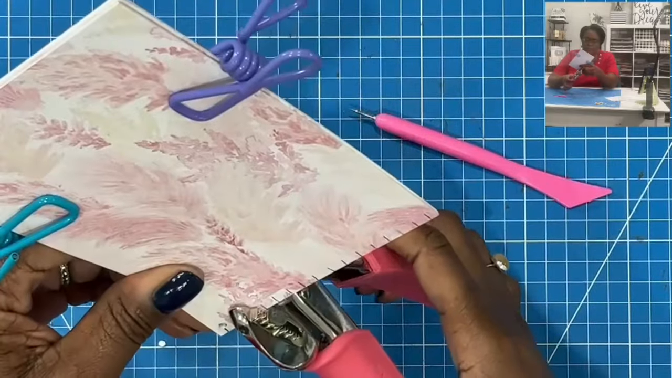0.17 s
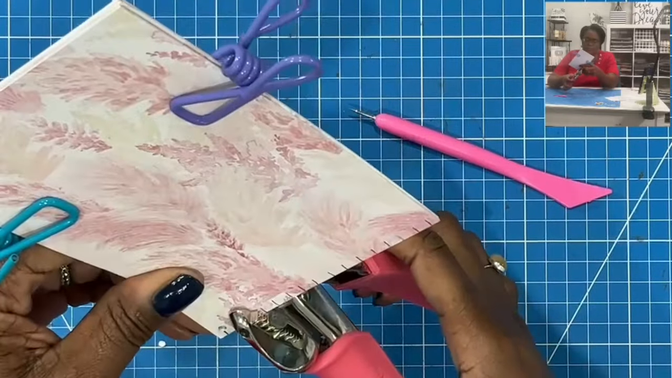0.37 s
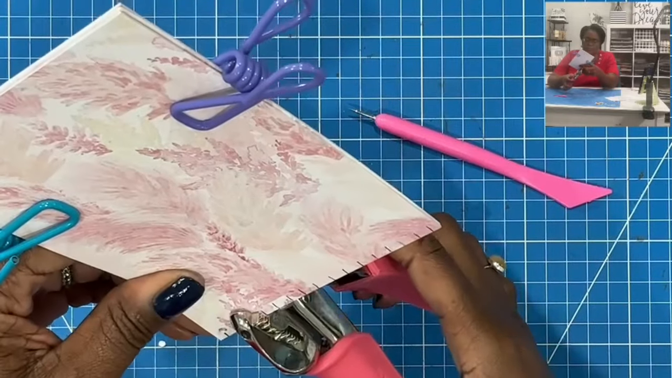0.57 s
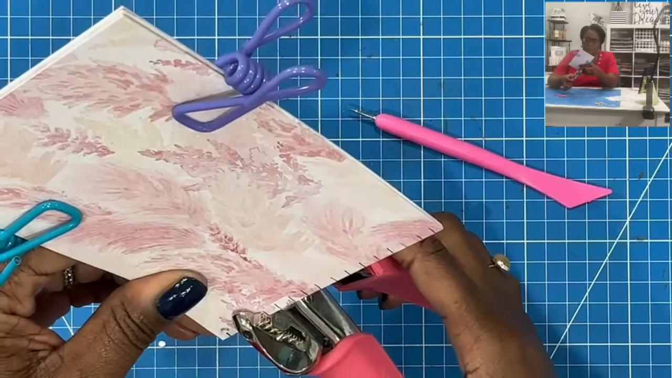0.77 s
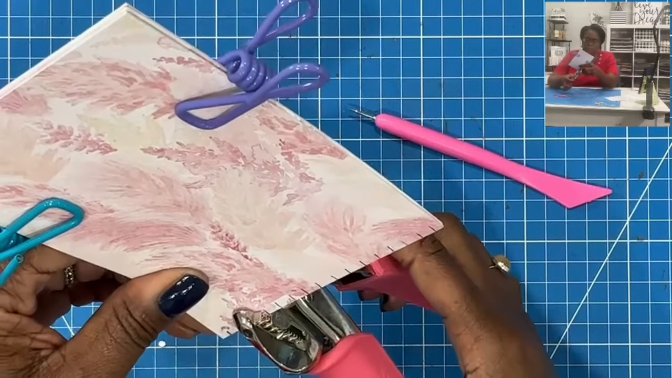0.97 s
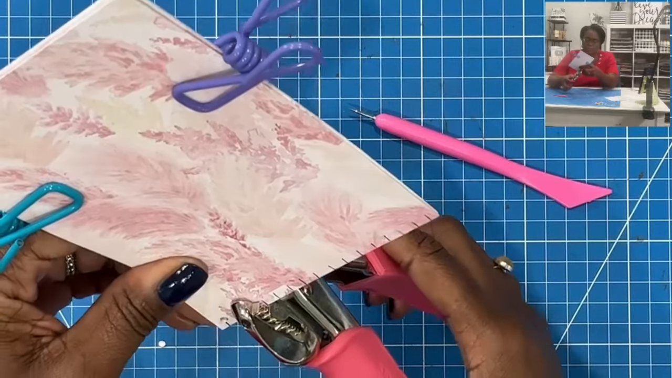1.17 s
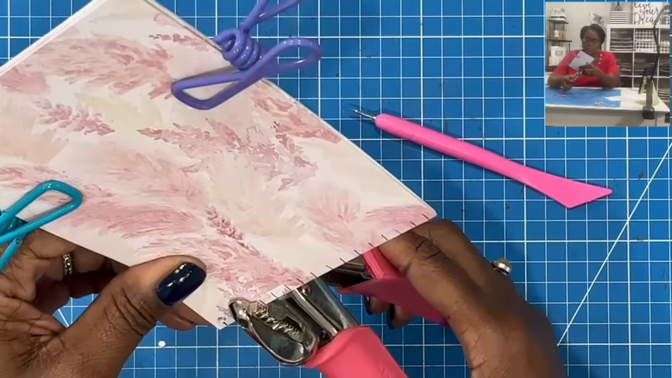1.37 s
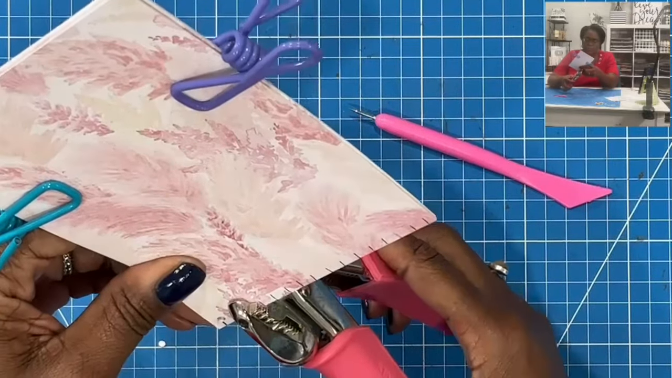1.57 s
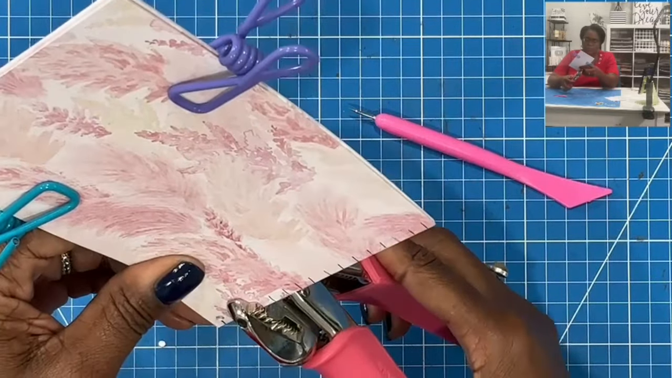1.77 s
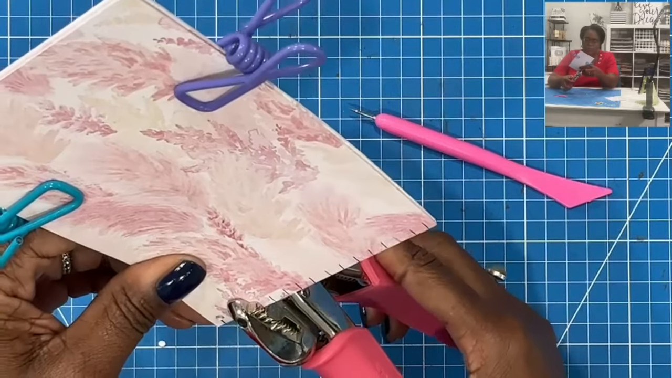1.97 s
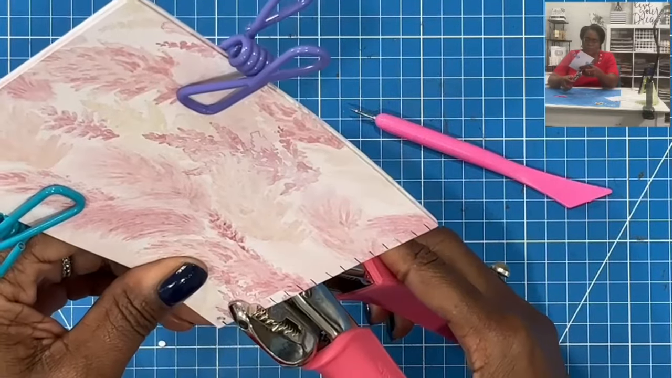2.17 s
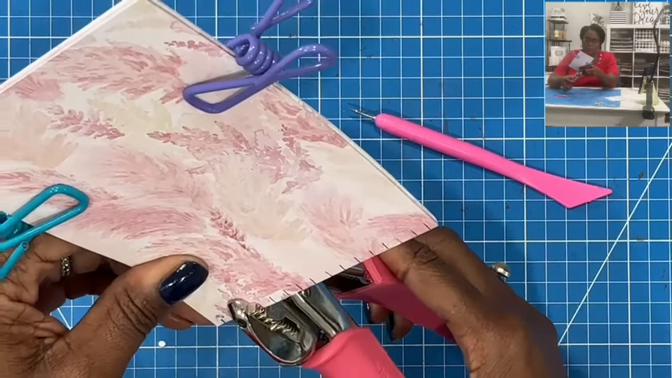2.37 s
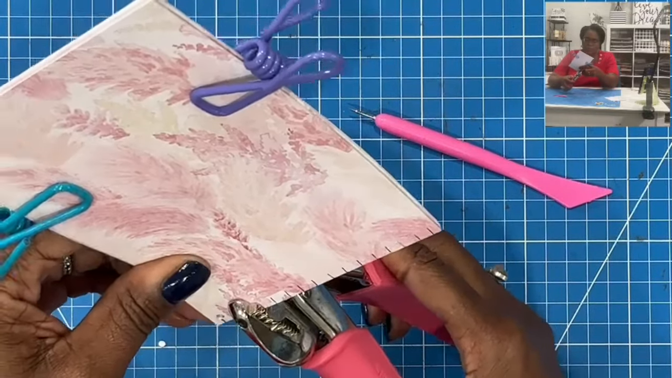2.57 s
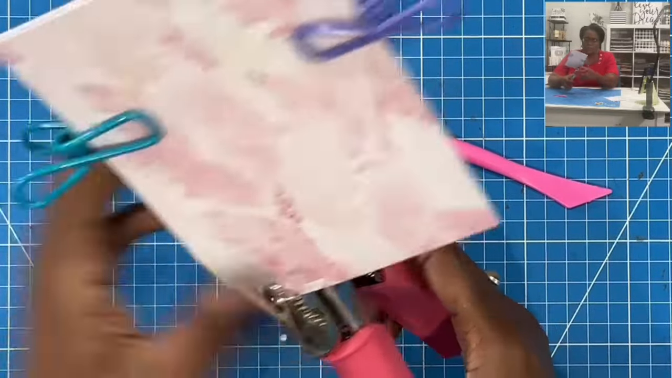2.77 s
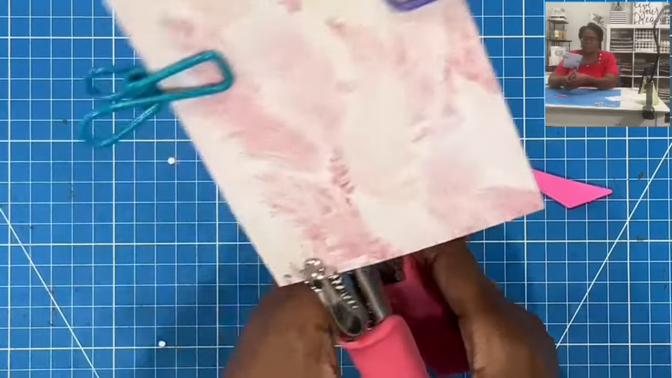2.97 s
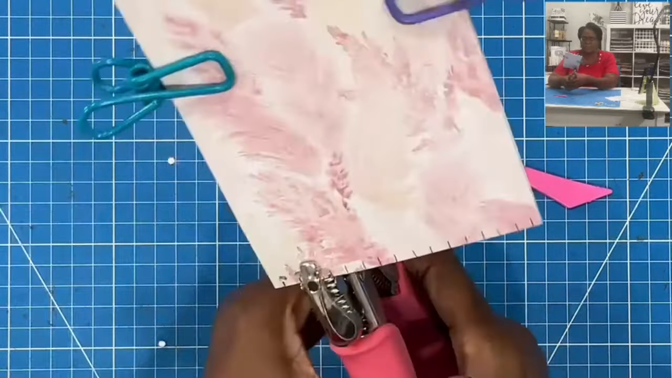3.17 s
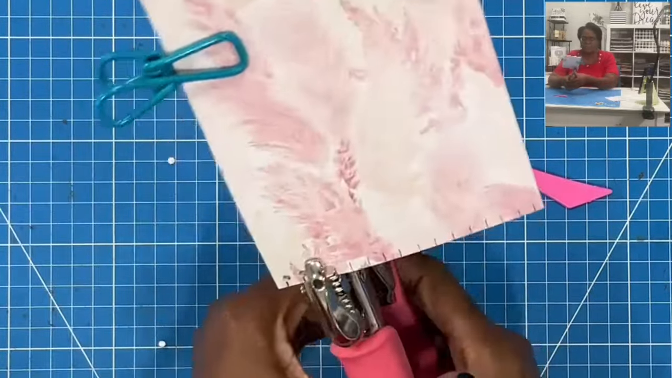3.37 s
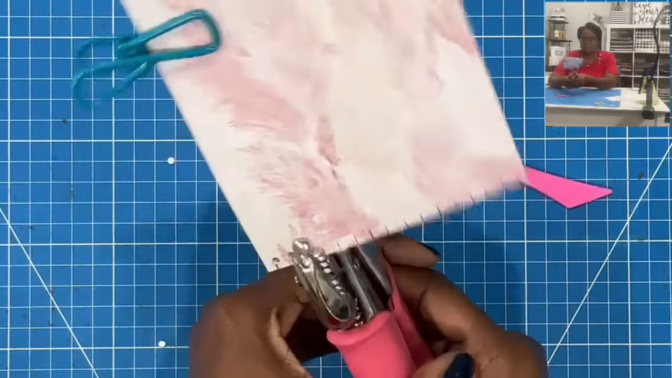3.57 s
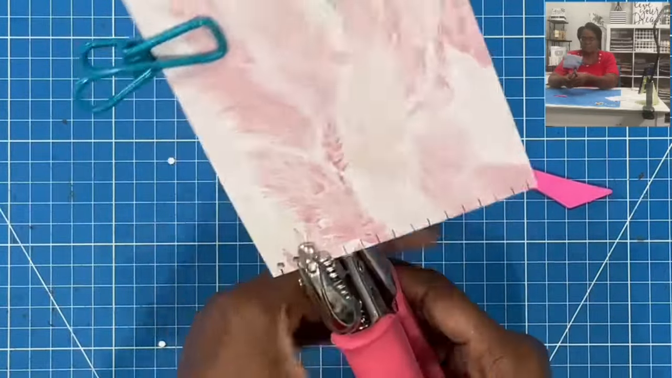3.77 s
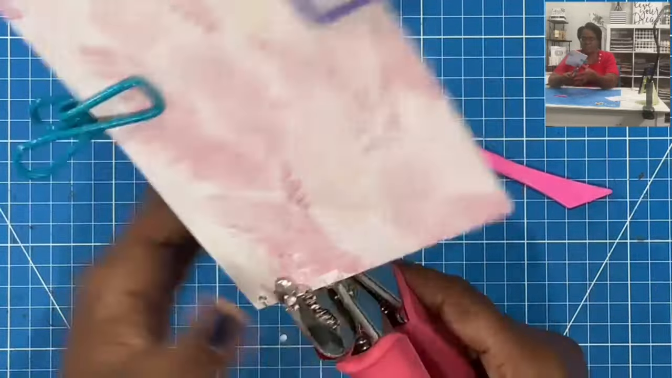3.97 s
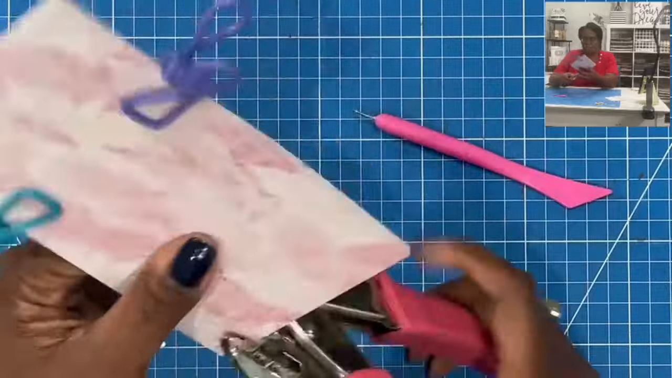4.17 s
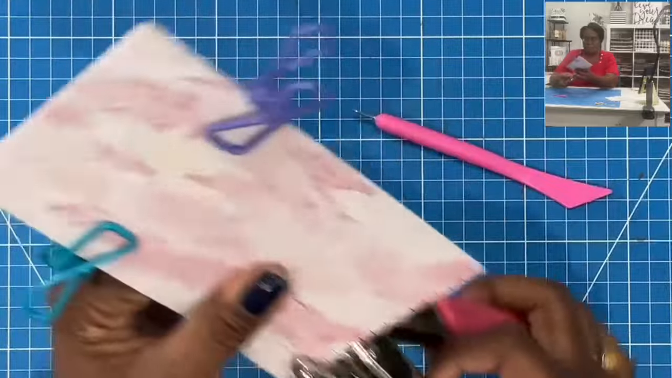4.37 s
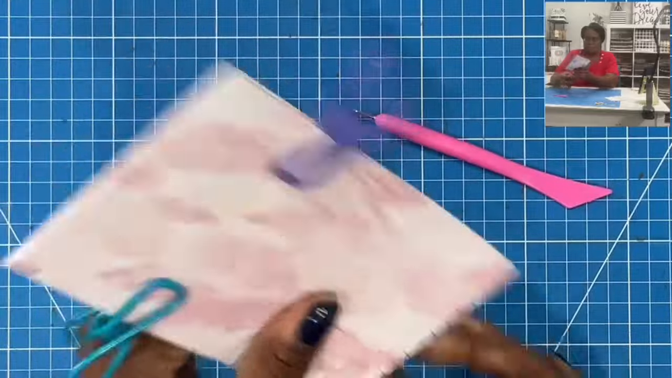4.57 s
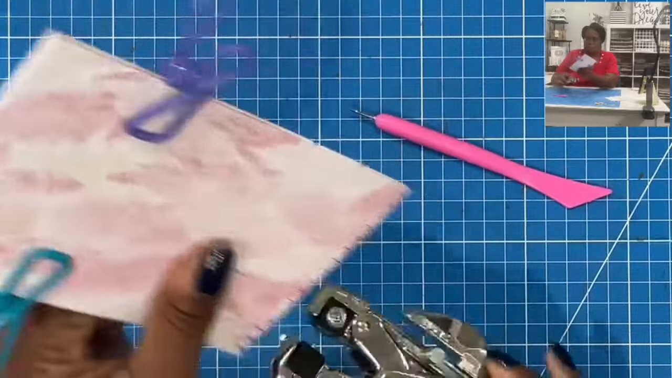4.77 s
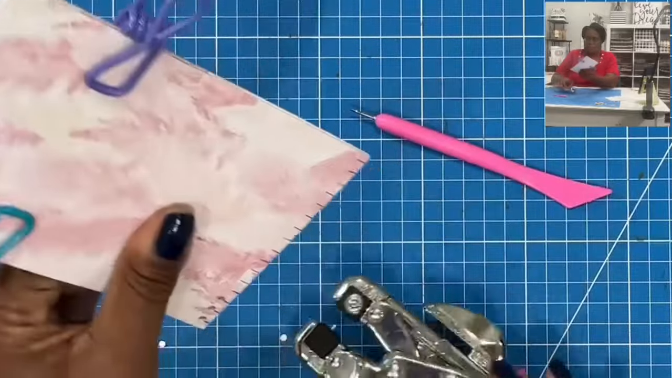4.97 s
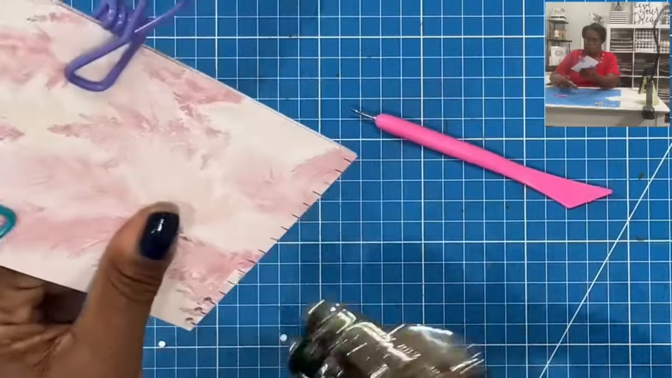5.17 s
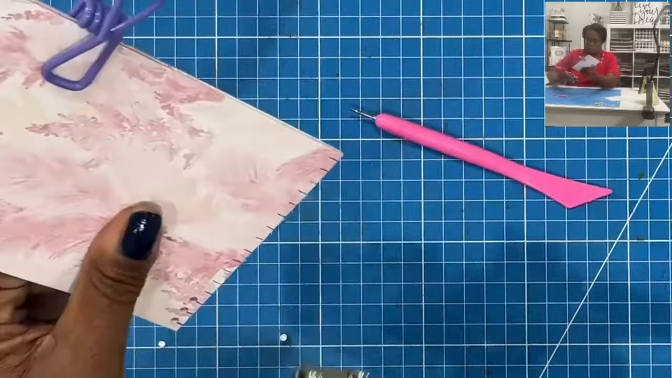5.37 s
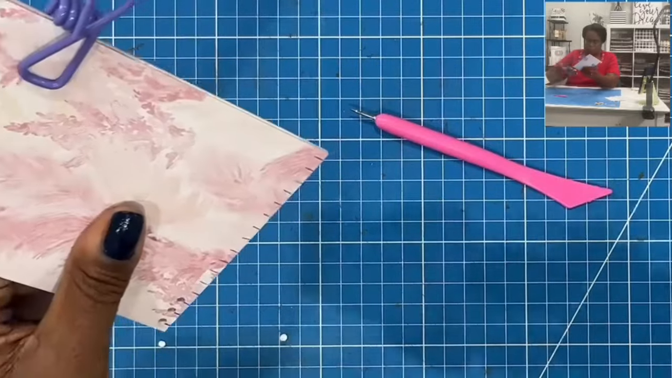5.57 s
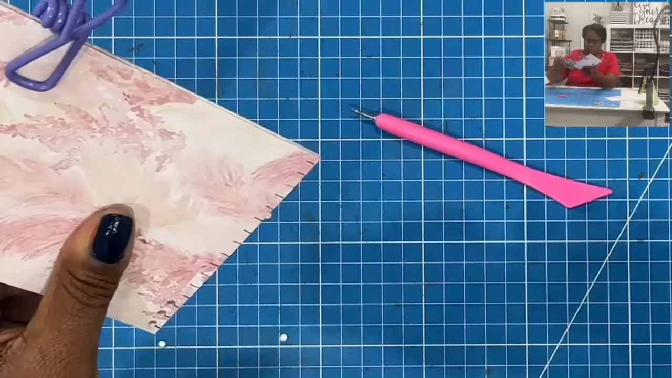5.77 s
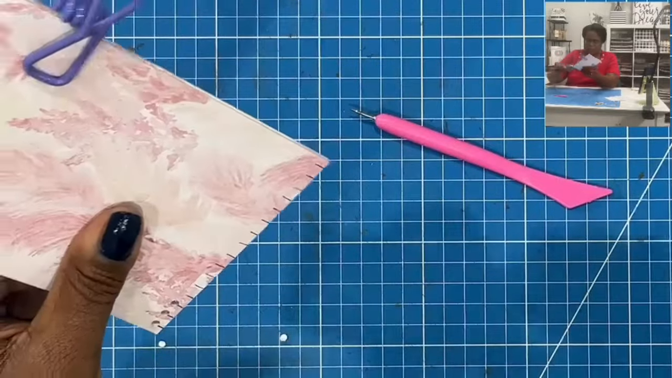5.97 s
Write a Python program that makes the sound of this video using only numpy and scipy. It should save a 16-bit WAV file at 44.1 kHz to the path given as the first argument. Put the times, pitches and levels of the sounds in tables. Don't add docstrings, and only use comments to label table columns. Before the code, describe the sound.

Steady soft fan noise and fuzzy low drones run throughout. After some very faint handling of card comes a single loud, compact snap of steel jaws biting through it, with a short room tail. Soft scuffs and a thin steel squeak follow as the card is pulled out, then small clicks, a bright jingle and chatter as the tool meets the desk. Small room, heard from far off.

```python
import sys
import numpy as np
from scipy import signal
from scipy.fft import rfft, irfft, next_fast_len
from scipy.io import wavfile
from scipy.ndimage import uniform_filter1d

SR = 44100
rng = np.random.default_rng(int(sys.argv[2]) if len(sys.argv) > 2 else 0)


def store_pcm(level_fs):
    pcm = np.round(np.clip(level_fs, -1, 1) * 32767).astype(np.int16)
    wavfile.write(sys.argv[1], SR, np.atleast_2d(pcm).T)


def amplitude_ratio(level_db):
    exponent = np.asarray(level_db, float) / 20
    return 10 ** exponent


N = 265658

# (frequency [Hz], level [dB per Hz])
AIR_COLOUR = [(30, -44), (45, -17.5), (60, 0), (110, -6.5), (170, -10.5), (450, -14), (700, -12),
              (1250, -17), (2200, -20.5), (3000, -26.5), (4000, -36.5), (6500, -37.5), (10000, -33),
              (15500, -41.5)]
# (frequency [Hz], width [Hz], level [dB], steady part against wavering part [ratio])
DRONES = [(62.7, 24, -58, 0.75), (103.5, 18, -58, 0.16), (319, 120, -55, 2.6)]
# (time [s], frequency [Hz])
MOTOR_TURNS = [(0, 1115), (1.25, 1083), (2.55, 1112), (3.55, 1095), (4.25, 1107), (5.1, 1095), (6.03, 1108)]
# (time [s], centre [Hz], width [octaves], level [dB])
SCUFFS = [(1.199, 2700, 0.28, -41.5), (1.199, 484, 0.66, -42), (1.203, 1500, 0.83, -41.5),
          (1.707, 4100, 0.86, -46.5), (4.035, 1390, 1.04, -33), (4.041, 4280, 0.53, -37.5),
          (4.035, 343, 0.77, -41), (4.154, 8000, 1.1, -33), (4.200, 960, 0.87, -35),
          (4.458, 6200, 0.34, -41), (4.561, 285, 0.6, -43)]
# (time when full [s], level [dB], hold [s], fall [dB/s], dull share [dB])
BRUSHES = [
    (2.708, -63, 0.0016, 120, 4),
    (3.88, -67, .004, 600, -1.5),
    (4.3, -56, 0.0017, 70, 7),
    (4.46, -53.5, .002, 63, -1),
    (4.622, -54, .002, 123, -0.5),
    (4.74, -75, .002, 36, 15),
    (5.258, -57, 0.0022, 350, -19),
    (5.436, -56, 0.0045, 1500, -8),
]
# (frequency [Hz], level [dB per Hz])
BRUSH_COLOUR = [(1500, -8), (3500, -6), (5500, -5.5), (7800, -8.5), (10000, -1.5), (11800, -6),
                (13500, -17.5), (16000, -23)]
# (time [s], blow [dB], grip ring [dB], card thump [dB])
SNAP_STAGES = [
    (3.5145, -10, -10, -24.5),
    (3.5199, -19, -14, -19.5),
    (3.5235, -3.5, -20.5, -6),
    (3.529, -17.5, -22, -12.5),
    (3.534, -17, -32, -22),
]
# (frequency [Hz], level [dB per Hz])
CRACK_COLOUR = [(120, -31.5), (200, -17), (330, -4), (750, -12), (1100, -3.5), (1500, -4.5), (2500, -1),
                (3400, -4), (4500, -4.5), (6300, -7), (9800, -3.5), (12800, -5), (15500, -17.5)]
# (frequency [Hz], level [dB], time to fall 60 dB [s])
STEEL_MODES = [(2275, 3, .03), (2590, 0, 0.022), (3340, -4, 0.025), (4850, -8.5, 0.02), (5690, -0.5, 0.011),
               (9720, 9, .011), (13500, 0, 0.015)]
# (frequency [Hz], level [dB], time to fall 60 dB [s])
CARD_MODES = [(264, 2, 0.04), (323, -1, .04), (530, -5.5, 0.03)]
# (multiple of its pitch [ratio], level [dB], time to fall 60 dB [s])
GRIP_MODES = [(1.001, 3.5, 0.05), (1.2, -9, .03), (1.64, -11, 0.017), (1.33, -1, 0.027)]
# (frequency [Hz], level [dB], time to fall 60 dB [s])
HINGE_MODES = [(2636, -6, 0.016), (3620, 1, 0.0053), (2100, -7.5, 0.016)]
# (time when full [s], level [dB], hold [s], fall [dB/s], dull share [dB])
DRAGS = [
    (4.174, -37, 0.02, 161, -16),
    (4.28, -76, .002, 170, 0),
]
# (frequency [Hz], level [dB per Hz])
DRAG_COLOUR = [(880, -44), (1500, -17), (1900, 0), (2230, -27), (3000, -7), (3770, 0), (5540, -3),
               (6060, -6), (9950, -1), (16000, -10)]
# (time [s], grip pitch [Hz], grip [dB], lever [dB], pin [dB])
KNOCKS = [
    (4.173, 1020, -53, -47, -32),
    (5.453, 1070, -31, -48, -37.5),
    (5.551, 1087, -41, -46, -68),
    (5.565, 1346, -35, -36.5, -47),
    (5.687, 1280, -58, -40, -35),
    (5.774, 1088, -34, -37.5, -47),
    (5.805, 1084, -48, -45, -31.5),
    (5.873, 1090, -33, -34, -27),
    (6.014, 1334, -33.5, -42, -56),
]
# (frequency [Hz], level [dB], time to fall 60 dB [s])
LEVER_MODES = [(5230, -5.5, 0.015), (6540, -39.5, .005), (6840, 22, 0.0017)]
# (frequency [Hz], level [dB], time to fall 60 dB [s])
PIN_MODES = [(9600, 20, 0.0073), (10660, 26, 0.004), (12900, -4, 0.0044), (15000, -12, .004)]
PART_SPREAD = (0.029, .08, 0.16, 0.175)
# (time when full [s], level [dB], hold [s], fall [dB/s], octave [dB])
SQUEAKS = [
    (4.256, -40.5, 0.0087, 1500, -14),
    (4.305, -53.5, .005, 600, -8),
]
# (time [s], level [dB])
JINGLES = [
    (5.609, -41),
    (5.628, -34.5),
    (5.650, -52),
]
# (frequency [Hz], level [dB], time to fall 60 dB [s])
STOP_MODES = [(5570, -4, 0.028), (5740, -9, 0.014), (9270, -4, 0.022), (9540, -1, 0.035), (10940, -7, .02),
              (13400, -16, .02), (15000, 0.5, 0.034)]
# (time when full [s], level [dB], hold [s], fall [dB/s], dull share [dB])
CHATTERS = [
    (5.616, -43.5, 0.077, 380, -5.5),
    (5.812, -34.5, .002, 330, -6),
    (5.884, -31, .002, 162, -7.5),
]
# (frequency [Hz], level [dB per Hz])
CHATTER_COLOUR = [(1500, -23), (3500, -27), (4400, -4), (5200, -1), (7500, -2), (10000, 2.5), (13000, -3.5),
                  (16000, -8.5)]
RISE = dict(drag=910, brush=156, chatter=1100., squeak=330)
# (frequency [Hz], time to fall 60 dB [s])
WALLS = [(300, 0.17), (1000, 0.2), (3500, 0.19), (8000, 0.19), (15000, 0.21)]
# (frequency [Hz], time to fall 60 dB [s])
HALL = [(300, 0.42), (1500, 0.46), (3800, 0.56), (7000, 0.42), (15000, .25)]
# (delay [s], level [dB])
ECHOES = [(.0046, -5), (.0093, 2), (.0150, -3), (.0205, -3)]


def evened(x):
    return x / np.sqrt(np.mean(x ** 2) + 1e-20)


def read(points, hz):
    f, value = np.transpose(points)
    return np.interp(np.log(hz + 1), np.log(f + 1), value)


def add(mix, s, sound):
    part = mix[round(s * SR):][:len(sound)]
    part += sound[:len(part)]


def coloured(x, points):
    size = next_fast_len(len(x))
    gain = amplitude_ratio(read(points, np.fft.rfftfreq(size, 1 / SR)))
    return evened(irfft(rfft(x, size) * gain, size)[:len(x)])


def click(colour_db):
    log_gain = np.log(amplitude_ratio(np.maximum(colour_db, -80)))
    full = np.concatenate([log_gain, log_gain[-2:0:-1]])
    pulse = np.fft.ifft(np.exp(np.conj(signal.hilbert(full)))).real[:1024]
    return pulse / abs(pulse).max()


def scatter(size):
    phase = 2j * np.pi * rng.random(size // 2 + 1)
    smear = irfft(np.exp(phase), size) * np.linspace(1.4, .4, size)
    return smear / np.linalg.norm(smear)


def strokes(rows, rise):
    s, db, hold, fall, side_db = np.transpose(rows)[..., None]
    t = np.arange(N) / SR - s
    level_db = db + rise * np.minimum(t, 0) - fall * np.maximum(t - hold, 0)
    return amplitude_ratio(level_db).sum(0), amplitude_ratio(level_db + side_db).sum(0)


def ring(modes, spread_db=4.0, damp=1.0, crowd_db=-3.5, width=0.19, rise_cycles=0.98, count=5):
    t = np.arange(SR // 12) / SR
    hz, db, t60 = np.repeat(modes, count, axis=0).T[..., None]
    pitch_luck, level_luck, sign_luck = rng.standard_normal((3, len(hz), 1))
    main = (np.arange(len(hz)) % count == 0)[:, None]
    hz = hz * np.where(main, 1, 1 + width * pitch_luck)
    db = db + spread_db * level_luck + np.where(main, 0, crowd_db)
    t60 = t60 * damp * np.where(main, 1, .5)
    strength = np.sign(sign_luck) * amplitude_ratio(db - 60 * t / t60)
    attack = np.minimum(t * hz / rise_cycles, 1)
    return (strength * np.sin(2 * np.pi * hz * t) * attack).sum(0)


def grip(hz):
    return [(hz * k, db, t60) for k, db, t60 in GRIP_MODES]


def rubbing(rows, rise, colour):
    slips_per_s, uneven_db = 15000, 1.5
    bright, dull = strokes(rows, rise)
    slips = rng.standard_normal(N) * amplitude_ratio(uneven_db * rng.exponential(1, N))
    slips *= rng.random(N) < slips_per_s / SR
    handle = ring(grip(1220), damp=0.12) + ring(HINGE_MODES, damp=0.35)
    body = evened(signal.oaconvolve(slips, handle)[:N])
    return bright * coloured(slips, colour) + dull * body


def whine():
    housing_hz, half_width_hz, peak_db = 1112, 7.3, -57
    s, turns_hz = np.transpose(MOTOR_TURNS)
    place = np.interp(np.arange(N) / SR, s, np.arange(len(s)))
    smooth_place = place // 1 + np.sin(np.pi / 2 * (place % 1)) ** 2
    hz = np.interp(smooth_place, np.arange(len(s)), turns_hz)
    gain = amplitude_ratio(peak_db) / np.hypot(1, (hz - housing_hz) / half_width_hz)
    return np.sqrt(2) * gain * np.sin(2 * np.pi * np.cumsum(hz) / SR)


def fan():
    t = np.arange(N) / SR
    out = amplitude_ratio(-51) * coloured(rng.standard_normal(N), AIR_COLOUR)
    for hz, width_hz, db, steady in DRONES:
        r = np.exp(-np.pi * width_hz / SR)
        a, b = signal.lfilter([1], [1, -2 * r, r * r], rng.standard_normal((2, N)))
        turn = 2 * np.pi * hz * t
        wave = (steady + evened(a)) * np.cos(turn) + evened(b) * np.sin(turn)
        out += amplitude_ratio(db) * evened(wave)
    return out + whine()


def scuffs():
    out, hz = np.zeros(N), np.fft.rfftfreq(2048, 1 / SR) + 1
    for s, centre_hz, octaves, db in SCUFFS:
        colour_db = -6 * (np.log2(hz / centre_hz) / octaves) ** 2
        add(out, s, amplitude_ratio(db + 10) * np.convolve(click(colour_db), scatter(size=256)))
    return out


def brushing():
    return rubbing(BRUSHES, RISE["brush"], BRUSH_COLOUR)


def snap():
    sharp, thud = np.zeros(N), np.zeros(N)
    crack = click(read(CRACK_COLOUR, np.fft.rfftfreq(2048, 1 / SR)))
    for s, db, grip_db, card_db in SNAP_STAGES:
        add(sharp, s, amplitude_ratio(db + 20) * np.convolve(crack, scatter(size=64)))
        add(sharp, s, amplitude_ratio(db - 11) * ring(STEEL_MODES))
        add(thud, s, amplitude_ratio(grip_db) * ring(grip(1046), damp=0.6, width=0.065))
        add(thud, s, amplitude_ratio(card_db - 5) * ring(CARD_MODES, width=0.064, rise_cycles=1.6))
    return sharp, thud


def knocks():
    out = np.zeros(N)
    for s, grip_hz, grip_db, lever_db, pin_db in KNOCKS:
        hinge_db = (grip_db + lever_db) / 2 - 1
        parts = grip(grip_hz), HINGE_MODES, LEVER_MODES, PIN_MODES
        parts_db = grip_db, hinge_db, lever_db, pin_db
        for part, db, spread in zip(parts, parts_db, PART_SPREAD):
            sound = ring(part, crowd_db=-8.0, width=spread, rise_cycles=3.85, count=12)
            add(out, s, amplitude_ratio(db + 11) * sound / abs(sound).max())
    return out


def dragging():
    return rubbing(DRAGS, RISE["drag"], DRAG_COLOUR)


def squeak():
    pitch_hz, waver_share = 7820, 0.0035
    main, octave = strokes(SQUEAKS, RISE["squeak"])
    waver = np.resize(evened(uniform_filter1d(rng.standard_normal(7497), 300)), N)
    turn = 2 * np.pi * np.cumsum(pitch_hz * (1 + waver_share * waver)) / SR
    return np.sqrt(2) * (main * np.sin(turn) + octave * np.sin(2 * turn))


def jingle():
    out = np.zeros(N)
    for s, db in JINGLES:
        add(out, s, amplitude_ratio(db + 6.0) * ring(STOP_MODES, crowd_db=-18.0))
    return out


def chattering():
    return rubbing(CHATTERS, RISE["chatter"], CHATTER_COLOUR)


def levelled(path, fine=24, broad=600):
    power = abs(rfft(path)) ** 2
    excess_db = 10 * np.log10(uniform_filter1d(power, fine) / uniform_filter1d(power, broad))
    steps = np.linspace(0, len(power), 1025)
    even = click(-np.interp(steps, np.arange(len(power)), excess_db))
    return signal.oaconvolve(path, even)[:len(path)]


def room(x, wet_db=13.5, hall_db=-16.5, build_s=0.0033):
    size = SR // 2
    hz, t, z = signal.stft(rng.choice([-1., 0., 0., 1.], size), SR, nperseg=256)
    near_fade = amplitude_ratio(-60 * t / read(WALLS, hz)[:, None])
    hall_fade = amplitude_ratio(hall_db - 60 * t / read(HALL, hz)[:, None])
    tail = signal.istft(z * np.hypot(near_fade, hall_fade), SR, nperseg=256)[1][:size]
    tail *= 1 - np.exp(-(np.arange(size) / SR / build_s) ** 2)
    path = amplitude_ratio(wet_db) * tail / np.linalg.norm(tail)
    path[0] += 1
    for s, db in ECHOES:
        add(path, s, amplitude_ratio(db) * scatter(size=128))
    path = levelled(path)
    no_bass = signal.butter(4, 230, "highpass", fs=SR, output="sos")
    return signal.oaconvolve(signal.sosfilt(no_bass, x), path / np.linalg.norm(path))[:N]


def scene():
    rubs = dragging() + chattering() + brushing()
    whistle = squeak()
    sharp, thud = snap()
    taps = knocks() + jingle() + scuffs()
    wet = room(sharp + 0.71 * thud + 0.76 * taps + 0.29 * rubs + 0.14 * whistle)
    direct = 0.38 * thud + 0.13 * taps + 0.6 * rubs + 0.84 * whistle
    return (wet + direct + fan())[None]


def band_limit(x):
    return signal.sosfilt(signal.butter(12, 16850, fs=SR, output="sos"), x)


def record(dry):
    no_rumble = signal.butter(4, 42, "highpass", fs=SR, output="sos")
    x = signal.sosfilt(no_rumble, dry)
    x = x / (1 + (abs(x) / .97) ** 6) ** (1 / 6)
    top_cut = signal.firwin(511, 15800, window=("kaiser", 10), fs=SR)
    x = signal.oaconvolve(x, top_cut[None], "same")
    return band_limit(x)


dry = scene()
out = record(dry)
store_pcm(out)
```